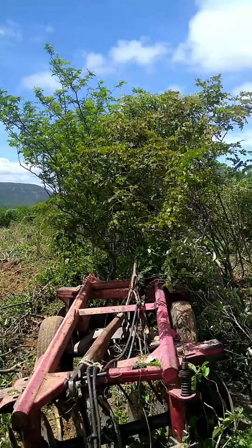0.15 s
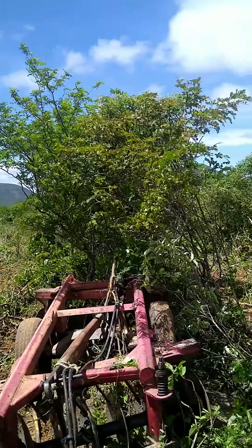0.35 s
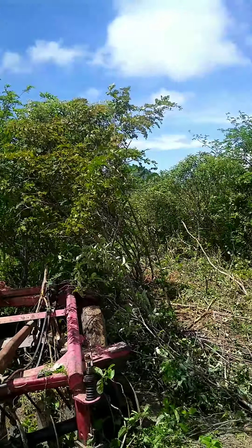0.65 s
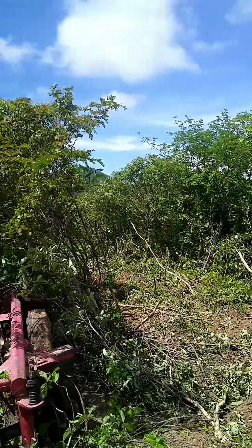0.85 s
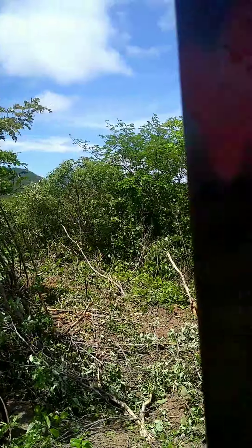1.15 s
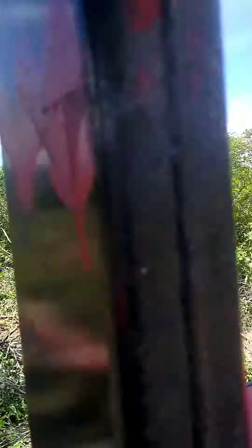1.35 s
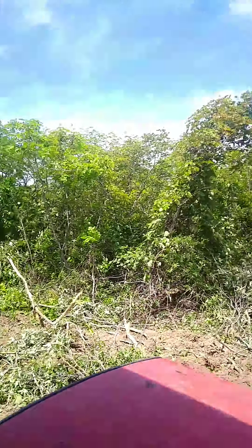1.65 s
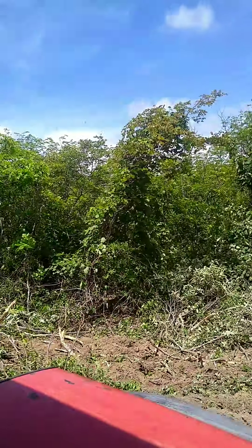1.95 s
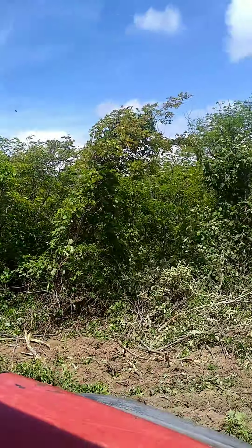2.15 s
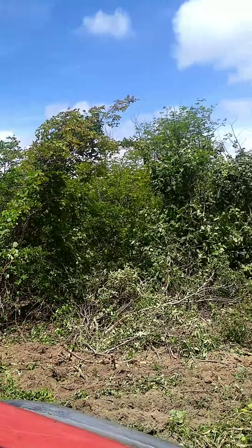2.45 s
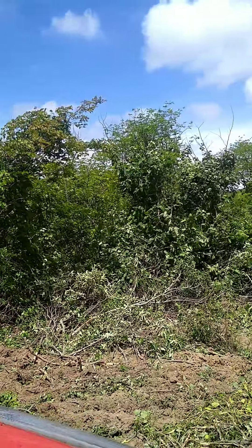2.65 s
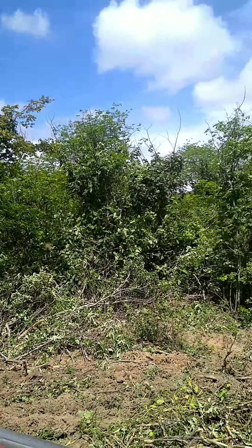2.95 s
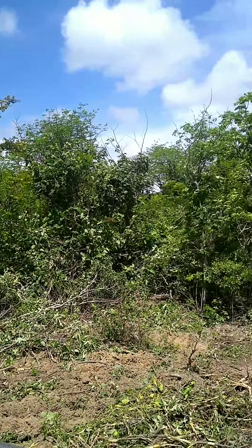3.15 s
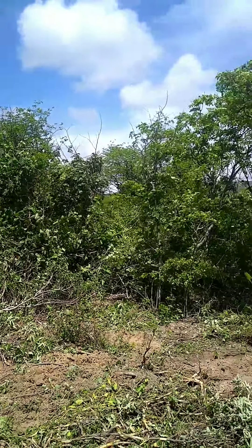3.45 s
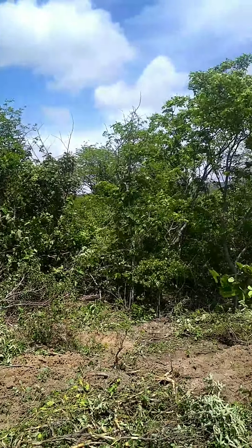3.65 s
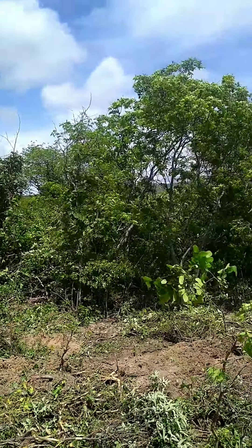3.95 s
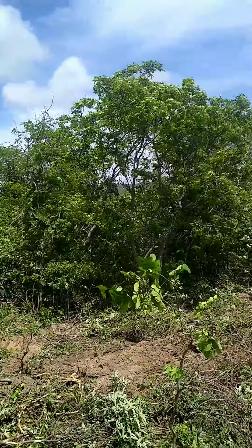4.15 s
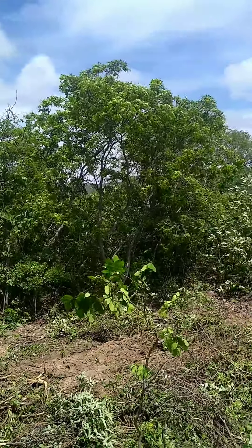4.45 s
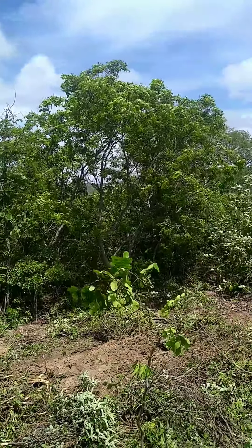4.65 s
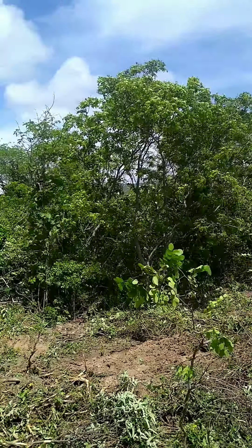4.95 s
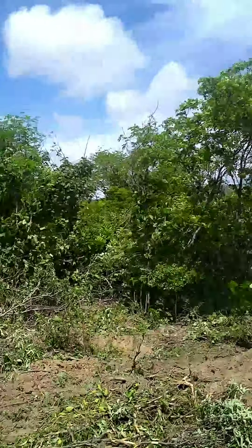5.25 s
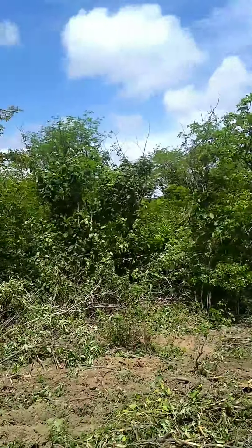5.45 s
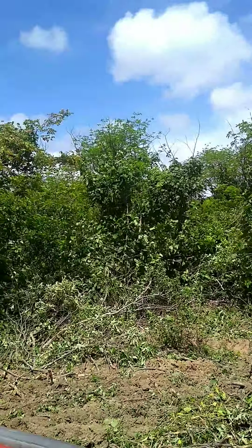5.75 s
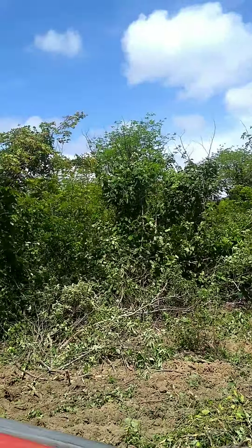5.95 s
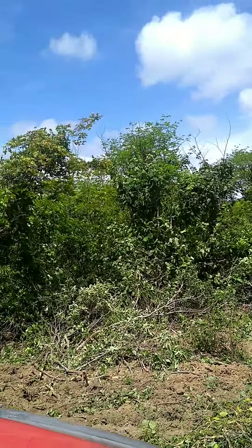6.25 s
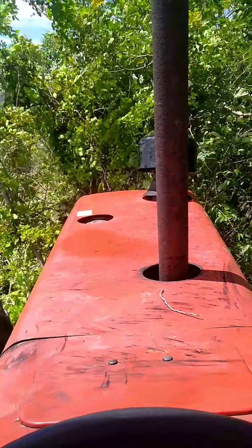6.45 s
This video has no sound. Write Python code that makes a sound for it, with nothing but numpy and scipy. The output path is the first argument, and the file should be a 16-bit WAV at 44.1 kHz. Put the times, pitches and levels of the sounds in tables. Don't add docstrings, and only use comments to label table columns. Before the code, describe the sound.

Close rattling tractor engine chugs evenly outdoors, a faint insect buzzing and wind slaps on the left, cutting to silence before fading back in.

```python
import sys
import numpy as np
from scipy import signal
from scipy.fft import rfft, irfft
from scipy.io import wavfile

SR = 44100
rng = np.random.default_rng(int(sys.argv[2]) if len(sys.argv) > 2 else 0)


def rack_gain(trim_db):
    fader = np.asarray(trim_db, float)
    return 10 ** (fader / 20)


def to_wav(sig):
    pcm = np.clip(np.atleast_2d(sig), -1, 1) * 32767
    pcm = np.round(pcm).astype(np.int16)
    wavfile.write(sys.argv[1], SR, pcm.T)


N = 291060
TIME = np.arange(N) / SR
HZ = np.maximum(np.fft.rfftfreq(N, 1 / SR), 1)

BOOM_HZ, BOOM_WIDTH_HZ = 151, 16
KNOCK_LEAD_TURNS = .187
RESUME_S = 6.473


def in_time(rows):
    s, *columns = np.transpose(rows)
    return np.array([np.interp(TIME, s, c) for c in columns])


def at_hz(rows, hz, column=1):
    rows = np.array(rows)
    return np.interp(np.log(hz), np.log(rows[:, 0]), rows[:, column])


def rms_one(x):
    return x / np.sqrt(np.mean(x ** 2) + 1e-20)


def drift(rate_hz):
    r = np.exp(-80 * np.pi * rate_hz / SR)
    slow = signal.lfilter([1], [1, -2 * r, r * r], rng.standard_normal(N // 40 + 2002))[2000:]
    return np.interp(np.arange(N) / 40, np.arange(len(slow)), rms_one(slow - slow.mean()))


def one_pole(x, seconds):
    return signal.lfilter([1], [1, -np.exp(-1 / (max(seconds, 1e-4) * SR))], x + 1e-18)


def passes(turns, lead):
    return np.flatnonzero(np.diff(np.floor(turns + lead)) > 0)


def ports(common, other):
    # hz, share (0-1)
    likeness = [(60, 0.99), (200, 0.84), (500, 0.79), (1400, 0.22), (4000, 0.39), (15000, 0.23)]
    # hz, left_minus_right_db
    shadow = [(60, -4), (110, 3), (200, -1), (380, -4), (700, 0), (1290, -6.5), (2000, -13.5), (2750, -5),
              (4400, -8), (8120, -15.5), (10500, -16), (15000, -8)]
    port_lag_s = 0.00032
    alike = np.clip(at_hz(likeness, HZ), 0, 1)
    tilt = rack_gain(at_hz(shadow, HZ) / 2)
    lead = np.exp(2j * np.pi * HZ * port_lag_s * np.clip(HZ / 1200, 0, 1))
    left = alike * lead * rfft(common) + np.sqrt(1 - alike ** 2) * rfft(other)
    return np.array([left * tilt, rfft(common) / tilt]) / np.sqrt((tilt ** 2 + tilt ** -2) / 2)


def turned(away_db, facing_db, resumed_db):
    # start_s, facing (0-1)
    facing = [(0, 0.09), (1.3, 0.18), (1.9, 0.51), (2.5, 0.69), (3.6, 0.96), (4.9, 1), (5.9, 0.72),
              (6.42, 0.77)]
    level_db = away_db + (facing_db - away_db) * in_time(facing)[0]
    return np.where(TIME < RESUME_S, level_db, resumed_db)


def heard_db(hz):
    # hz, facing_away_db, facing_full_db, after_the_change_db
    direction = [(300, 4, 1.65, 3.5), (830, 4.5, 2.74, 6), (1670, -5, 1, -2.5), (2700, -4, 3, 7.5),
                 (4200, 4, -1.5, 6), (8450, 2.2, 2.5, 0)]
    level_db = turned(*(at_hz(direction, hz, k) for k in (1, 2, 3)))
    shade_db = turned(-1.4, 1.5, -0.5) * min(hz / 900, 1)
    return level_db + shade_db * np.array([[-.5], [.5]])


def boom_level_db():
    # centre_s, extra_db
    surges = [
        (1.4, 3),
        (2.4, 8),
        (3.15, 4),
        (3.7, 3),
        (4.05, 4),
        (5.15, 0.5),
        (5.9, 5),
        (6.3, 7.5),
    ]
    surge_spread_s = 0.072
    extra_db = sum(db * np.exp(-.5 * ((TIME - s) / surge_spread_s) ** 2) for s, db in surges)
    return turned(-4, 1.5, -26) + extra_db


def exhaust(turns):
    # crank_order, rms_db
    orders = [(3, -34.3), (3.5, -52), (4, -37), (4.5, -51), (5, -35), (5.5, -40), (6, -36), (7, -39),
              (7.5, -41), (8, -40), (8.5, -41), (9, -46), (10, -50), (10.5, -45), (11, -51), (11.5, -53),
              (14, -49), (14.5, -52)]
    turns_per_s, puff_lag_turns = 18, .017
    second_lead_turns, second_share = .21, .35
    out, boom_db = 0, boom_level_db()
    for order, level_db in orders:
        half_order = order % 1 != 0
        angle = turns - puff_lag_turns + (second_lead_turns if half_order else 0)
        near_boom = 1 / (1 + ((order * turns_per_s - BOOM_HZ) / (2 * BOOM_WIDTH_HZ)) ** 2)
        phase = 2 * np.pi * order * angle + 0.081 * drift(0.83) + 0.083 * drift(1.0) * [[1], [-1]]
        if not half_order:
            phase += np.angle(1 + second_share * np.exp(2j * np.pi * order * second_lead_turns))
        level_db = level_db + 3.8 + near_boom * boom_db + .7 * drift(1.2)
        out = out - rack_gain(level_db) * np.cos(phase)
    return out * rack_gain([[.6], [-.6]])


def boom(turns):
    at = np.r_[passes(turns, 0.33), passes(turns, 0.12)]
    puffs = np.zeros(N)
    puffs[at] = rng.standard_normal(len(at))
    r, w = np.exp(-np.pi * BOOM_WIDTH_HZ / SR), 2 * np.pi * BOOM_HZ / SR
    for _ in range(2):
        puffs = signal.lfilter([1, 0, -1], [1, -2 * r * np.cos(w), r * r], puffs + 1e-18)
    return rack_gain(boom_level_db() - 34.5) * rms_one(puffs)


def clatter(turns, force):
    # hz, level_db (per Hz)
    spectrum = [(24, -34), (40, -10), (120, 0), (230, -7), (388, -11.5), (439, -14), (780, -14),
                (1250, -14.5), (1780, -8), (2460, -24.5), (3670, -31), (4700, -37), (8780, -52.5),
                (10500, -53.5), (15600, -59)]
    # hz, over_steady_db, tail_t60_s, tail_under_crack_db, valve_tick_db, spread_db
    knock_bands = [(100, -4, .12, 0, -9, 3), (400, -3, .08, -3, -9, 3), (900, 1.5, .09, -4, -9, 3),
                   (1800, 4, .13, -3, 1, 2.5), (2800, 5, .15, -5, -8, 2.5), (3700, 9.5, .16, -10, -12, 2),
                   (7000, 10.5, .18, -11, -14, 2.6), (13000, 15.5, .16, -13, -15, 3)]
    tick_lag_turns, early_lead_turns = .27, .22
    rise_s, crack_t60_s = .0025, .024
    ticks = rng.standard_normal((2, N)) * rack_gain(1.27 * rng.standard_normal((2, N)))
    pair = ports(*ticks) * rack_gain(at_hz(spectrum, HZ))
    knocks = passes(turns, KNOCK_LEAD_TURNS)
    valves = passes(turns, KNOCK_LEAD_TURNS - tick_lag_turns)
    second_puffs = passes(turns, KNOCK_LEAD_TURNS + early_lead_turns)
    out = 0
    for hz in 45 * 2 ** np.arange(0, 9, 2 / 3):
        over_db, t60_s, tail_db, tick_db, spread_db = (at_hz(knock_bands, hz, k) for k in range(1, 6))
        blows = np.zeros(N)
        late = rng.integers(-90, 90, len(knocks))
        strength = force[knocks] + 0.77 * rng.standard_normal(len(knocks))
        blows[np.clip(knocks + late, 0, N - 1)] = rack_gain(spread_db * strength)
        tail = rack_gain(tail_db) * one_pole(blows, t60_s / np.log(1000))
        blows[valves] = rack_gain(tick_db + 2.6 * rng.standard_normal(len(valves)))
        blows[second_puffs] = rack_gain(-17) + rack_gain(8) / (1 + (hz / 1000) ** 4)
        crack = one_pole(blows, crack_t60_s / np.log(1000))
        burst = one_pole(one_pole(tail + crack, rise_s), rise_s)
        gate = 1 + rack_gain(over_db) * burst / np.percentile(burst, 95)
        mask = np.cos(np.pi / 2 * np.clip(1.5 * np.log2(HZ / hz), -1, 1)) ** 2
        out = out + irfft(pair * mask, N) * gate * rack_gain(heard_db(hz) + 0.77 * drift(14.7))
    return rack_gain(-24) * rms_one(out)


def block(turns, force):
    mode_hz = [560, 665, 778, 968, 1170, 1380, 1520, 1650, 1740, 1815, 2045, 2420, 3450, 3700, 3950]
    # level_db, t60_s
    mode_rings = [(-20, .06), (-4, .07), (-3.5, .12), (-15, 0.043), (-12, 0.072), (-0.5, .08), (-35, 0.058),
                  (-18, 0.074), (-3, .08), (-6.5, 0.12), (-3.5, .1), (-15, 0.086), (-11.5, 0.03),
                  (-9.5, 0.03), (-13, 0.025)]
    knocks, out = passes(turns, KNOCK_LEAD_TURNS), np.zeros((2, N))
    for hz, (level_db, t60_s) in zip(mode_hz, mode_rings):
        blows = np.zeros((2, N))
        for _ in range(8):
            late_s = .003 + rng.gamma(1.3, .13 * t60_s, len(knocks))
            at = np.minimum(knocks + (late_s * SR).astype(int), N - 1)
            blows[:, at] = rack_gain(level_db + 1.2 * force[knocks]) * rng.standard_normal((2, len(at)))
        r, w = rack_gain(-60 / (t60_s * SR)), 2 * np.pi * hz / SR
        out += signal.lfilter([0, np.sin(w)], [1, -2 * r * np.cos(w), r * r], blows + 1e-18)
    return rack_gain(-35 + heard_db(1400)) * irfft(ports(*out), N)


def gears(turns):
    # teeth_per_turn, rms_db, left_minus_right_db
    gear_train = [(21, -45.5, 1), (22, -53, -6), (43.1, -54, -1)]
    out = 0
    for teeth, level_db, pan_db in gear_train:
        level = rack_gain(level_db + 3 + 2.5 * drift(3) + pan_db * np.array([[.5], [-.5]]))
        out = out + level * np.sin(2 * np.pi * teeth * turns + .5 * drift(3))
    return rack_gain(turned(4, -3.0, 0)) * out


def clank():
    start_s, pitch_hz, level_db, t60_s = 6.59, 760, -13, .15
    age = np.maximum(TIME - start_s, 0)
    swell = np.minimum(age / 0.013, 1)
    return rack_gain(level_db - 60 * age / t60_s) * swell * np.sin(2 * np.pi * pitch_hz * age)


def singing():
    # start_s, length_s, level_db
    phrases = [
        (.5, 1.1, -64),
        (1.7, 0.8, -59),
        (3.15, 0.3, -61),
        (3.954, 1.05, -59.5),
        (5.4, .3, -64),
    ]
    edge_s = .25
    level = rack_gain(-60)
    for s, length, db in phrases:
        inside_s = np.minimum(TIME - s, s + length - TIME)
        level = level + rack_gain(db) * np.clip(inside_s / edge_s + .5, 0, 1)
    return level


def insect():
    bursts_per_s, clicks_per_burst = 38.3, 7
    wing_hz, wing_width_hz = 10550, 720.0
    beat = bursts_per_s * TIME + 0.035 * drift(6.4)
    clicks = np.zeros(N)
    at = passes(clicks_per_burst * beat, 0)
    clicks[at] = rack_gain(1.9 * rng.standard_normal(len(at))) * (0.5 + (beat[at] % 1 < .7))
    rasp = one_pole(clicks, .0014) * rng.standard_normal((2, N))
    wing = 1 / (1 + ((HZ - wing_hz) / wing_width_hz) ** 2)
    return rack_gain(-8.5) * singing() * rms_one(irfft(rfft(rasp) * wing, N)) * rack_gain([[-7], [7]])


def buffets():
    # centre_s, peak_db, width_ms
    slaps = [
        (2.661, -5, .9),
        (2.688, -8, .45),
        (2.7095, -5, 1.3),
        (2.722, -3.5, .8),
        (2.781, -11, 1.4),
        (2.822, -6, .6),
        (2.836, -8, 1.1),
    ]
    out = 0
    for s, peak_db, width_ms in slaps:
        age = (TIME - s) * 1000 / width_ms
        push = np.exp(-.5 * age ** 2)
        suction = .6 * np.exp(-.5 * ((age - 2.2) / 1.7) ** 2)
        out = out + rack_gain(peak_db) * (push - suction)
    return out * rack_gain([[0], [-18]])


def gusts():
    # centre_s, spread_s, left_port_db, right_port_db
    gust_list = [(.55, 0.17, -26.5, -33), (1.05, 0.21, -42, -45), (1.5, 0.038, -22.5, -48),
                 (2.35, 0.15, -32, -41), (2.66, 0.019, -16.5, -52), (2.71, 0.027, -12.5, -43),
                 (2.785, .012, -20, -37), (2.834, .018, -12.5, -31), (3.1, 0.11, -28, -24),
                 (3.27, .07, -25, -17), (3.45, 0.12, -27.5, -26.5), (3.7, 0.18, -29, -39),
                 (5.0, 0.35, -34, -43), (5.9, .04, -29, -34), (6.33, 0.076, -25, -31)]
    level = rack_gain(-40)
    for s, spread, left_db, right_db in gust_list:
        level = level + rack_gain([[left_db], [right_db]]) * np.exp(-.5 * ((TIME - s) / spread) ** 2)
    return level


def wind():
    # hz, level_db (per Hz)
    wind_spectrum = [(30, -21), (55, 6.5), (85, 0.5), (150, 3), (300, -7), (700, -15), (2000, -63)]
    lumps = rack_gain(4.46 * np.array([drift(10.2), drift(21)]))
    puffs = irfft(rfft(rng.standard_normal((2, N))) * rack_gain(at_hz(wind_spectrum, HZ)), N)
    return gusts() * rms_one(lumps * puffs)


def scene():
    # start_s, speed_turns_per_s
    crank_speed = [(0, 18.127), (.9, 18.035), (1.45, 17.909), (2.4, 17.988), (3.4, 18.103), (3.95, 18.036),
                   (4.7, 18.119), (6.6, 18.028)]
    # centre_s, extra_force_db
    hard_knocks = [(.57, 2), (.9, -6), (1.68, 4), (2.12, 2), (2.46, 5), (2.68, 4), (2.9, 2), (3.12, 5),
                   (3.35, 4.5), (4.12, 3), (4.9, 1), (5.34, 1), (6.0, -1)]
    start_turns, resume_turns = -.36, -.06
    turns = start_turns + np.cumsum(in_time(crank_speed)[0]) / SR + resume_turns * (TIME > RESUME_S)
    force = rng.uniform(-.5, .5, N) + .6 * np.cos(np.pi * np.floor(turns + .3))
    force += sum(extra_db / 4 * (abs(TIME - s) < .025) for s, extra_db in hard_knocks)
    engine = exhaust(turns) + boom(turns) + clatter(turns, force) + block(turns, force) + gears(turns)
    return engine + clank() + insect() + buffets() + wind()


def band_limit(x):
    return signal.sosfilt(signal.butter(12, 15740, fs=SR, output="sos"), x)


def record(dry):
    change_s, fade_s = 6.4168, .45
    low_cut = signal.sosfiltfilt(signal.butter(3, 38, "high", fs=SR, output="sos"), dry)
    fade_in = np.clip((TIME - RESUME_S) / fade_s + 0.07, 0, 1) * (TIME > RESUME_S)
    fader = (TIME < change_s) + fade_in
    return band_limit(0.74 * np.tanh(low_cut / 0.83) * fader)


dry = scene()
out = record(dry)
to_wav(out)
```